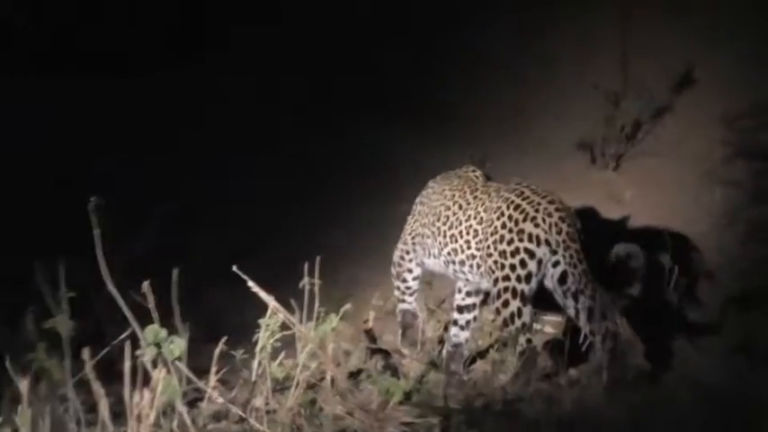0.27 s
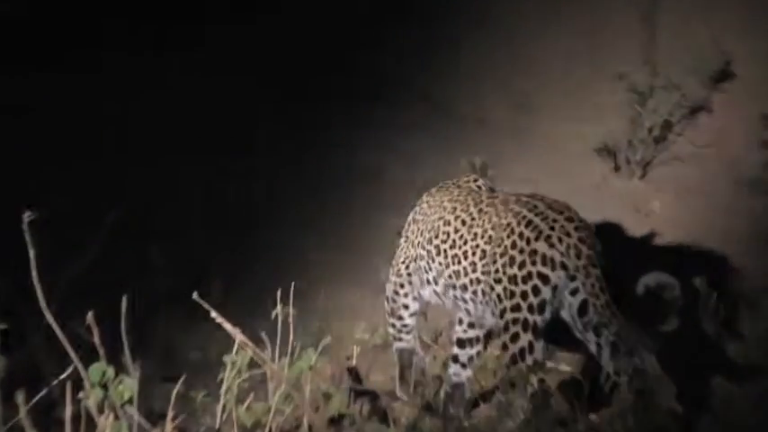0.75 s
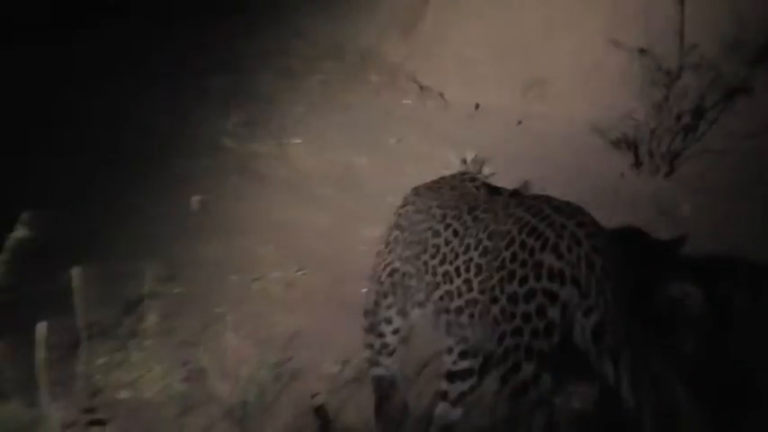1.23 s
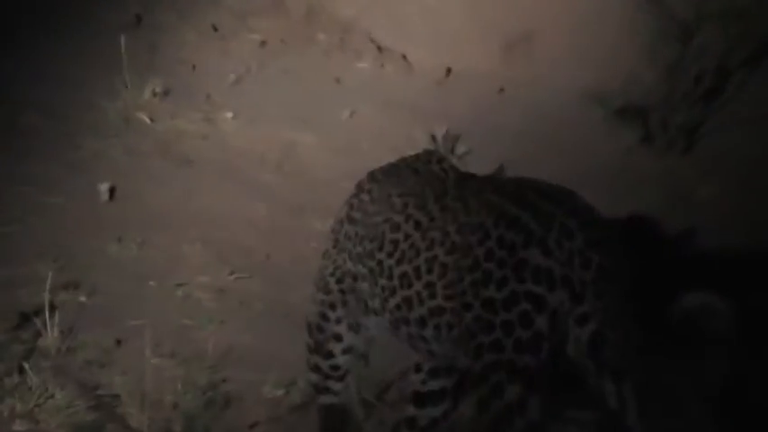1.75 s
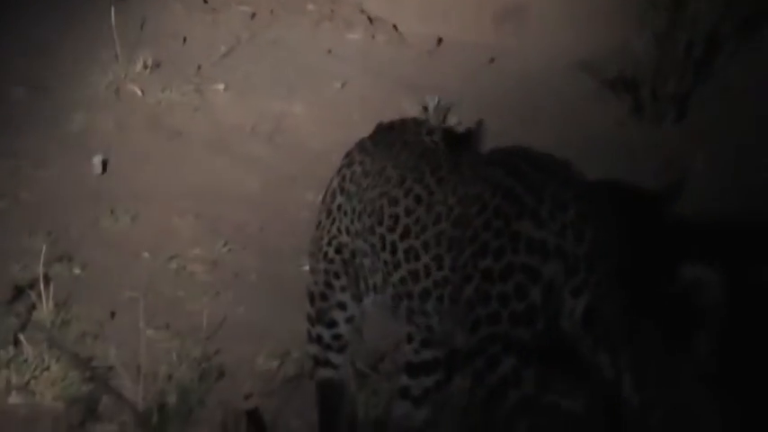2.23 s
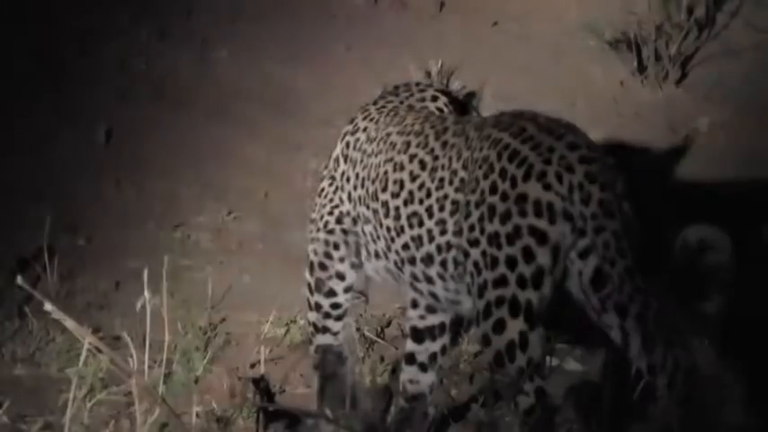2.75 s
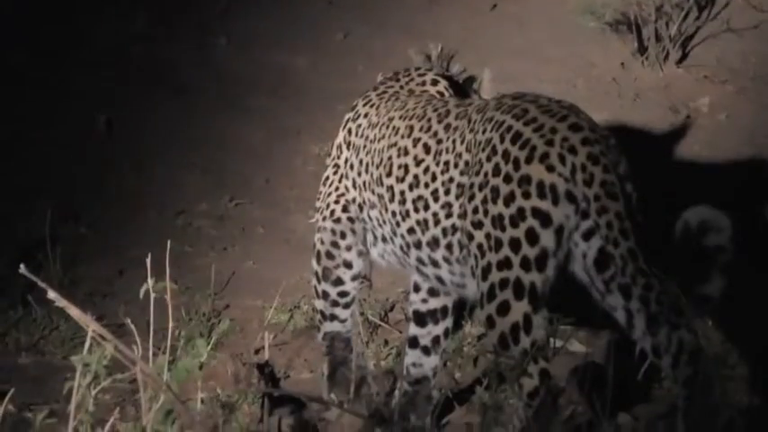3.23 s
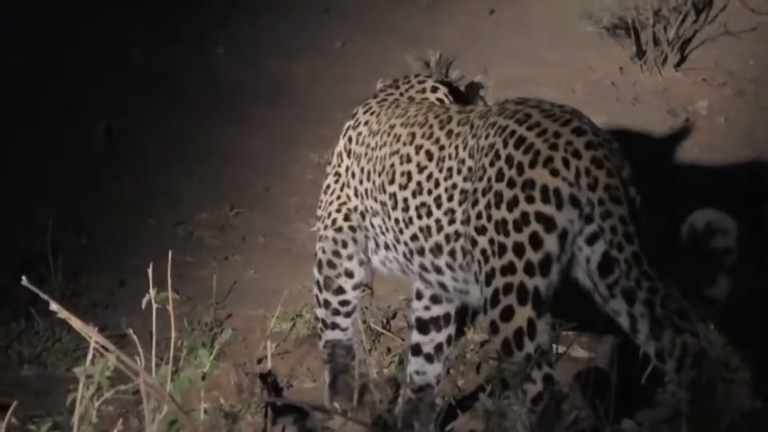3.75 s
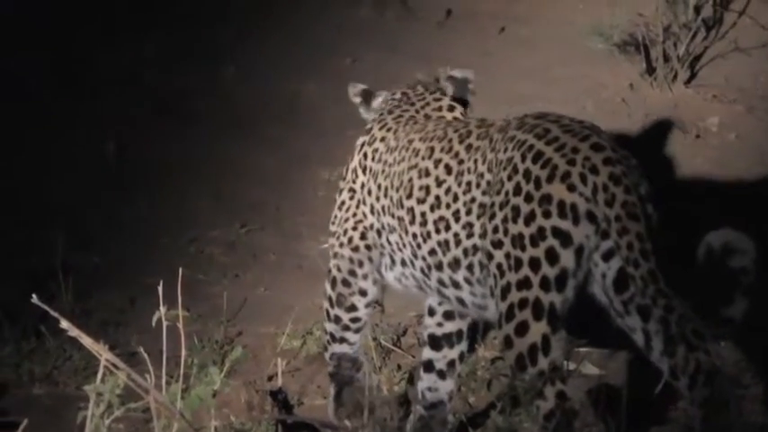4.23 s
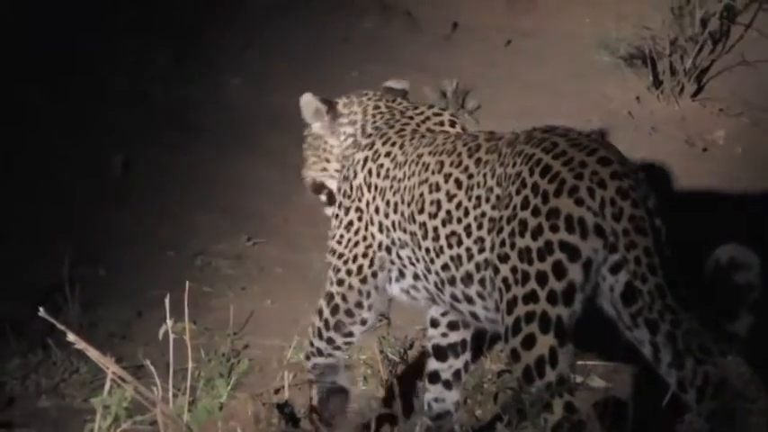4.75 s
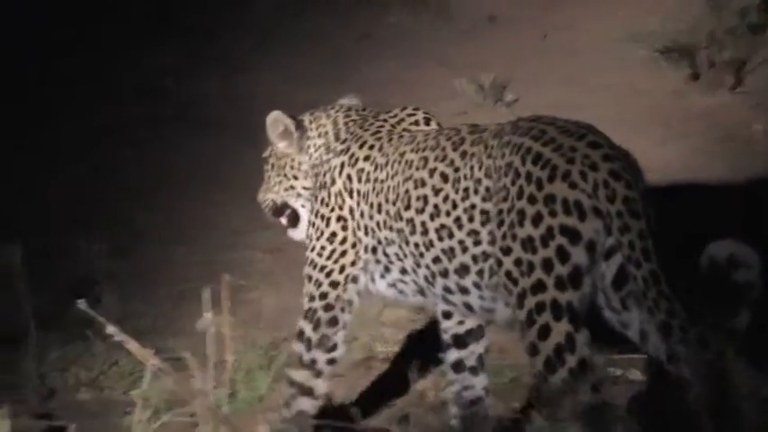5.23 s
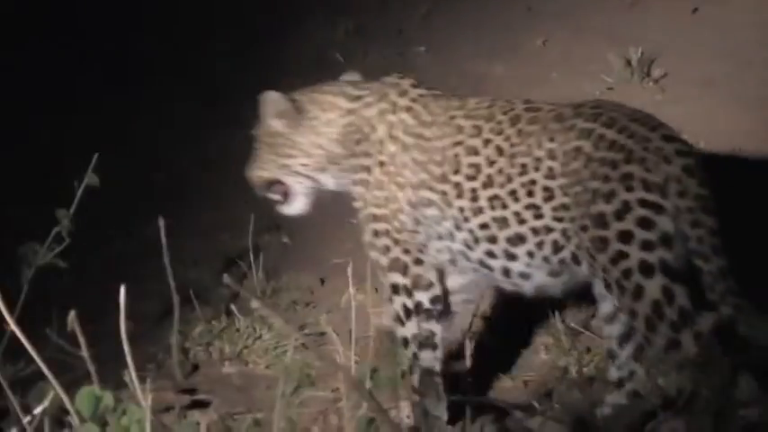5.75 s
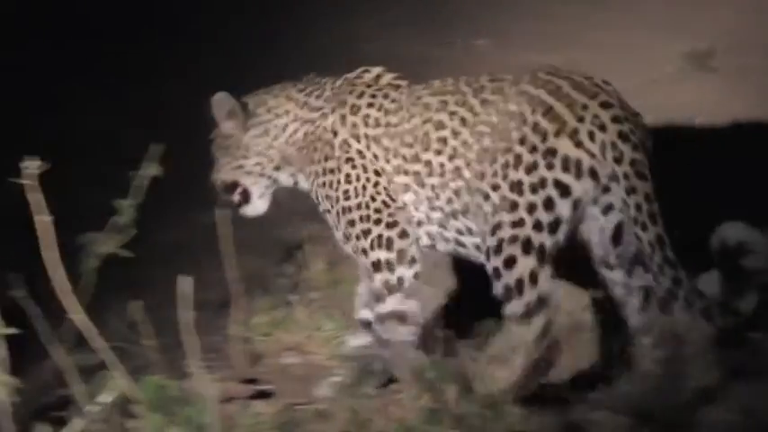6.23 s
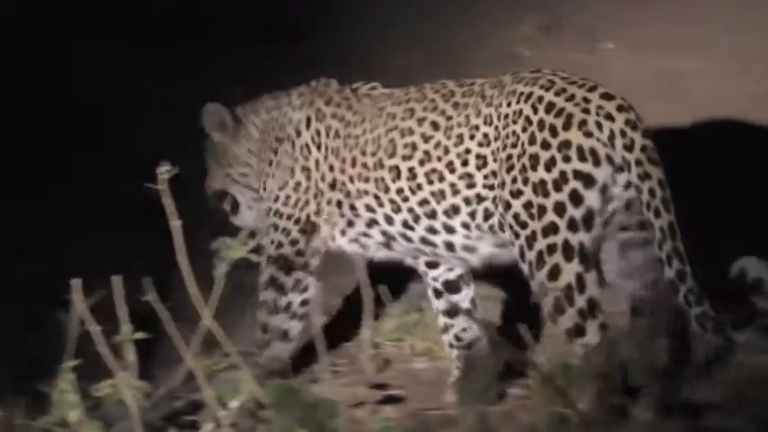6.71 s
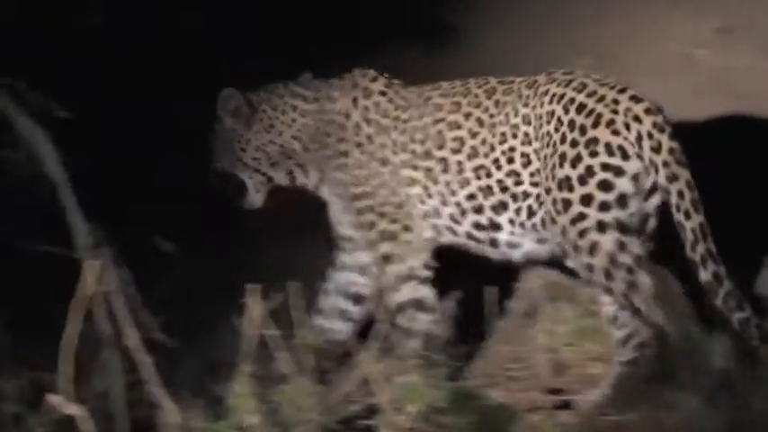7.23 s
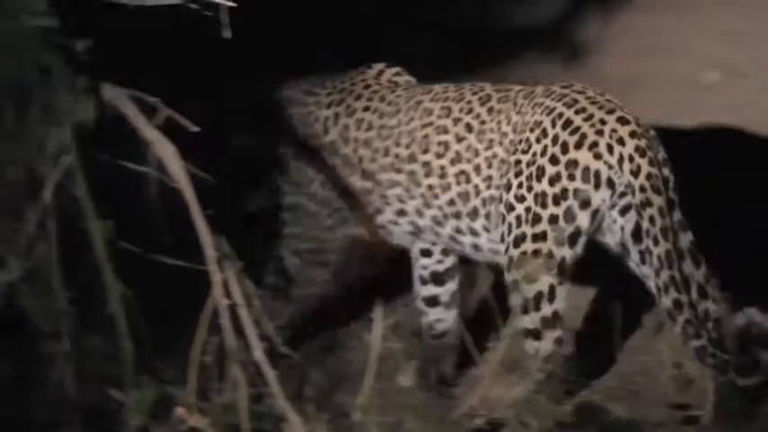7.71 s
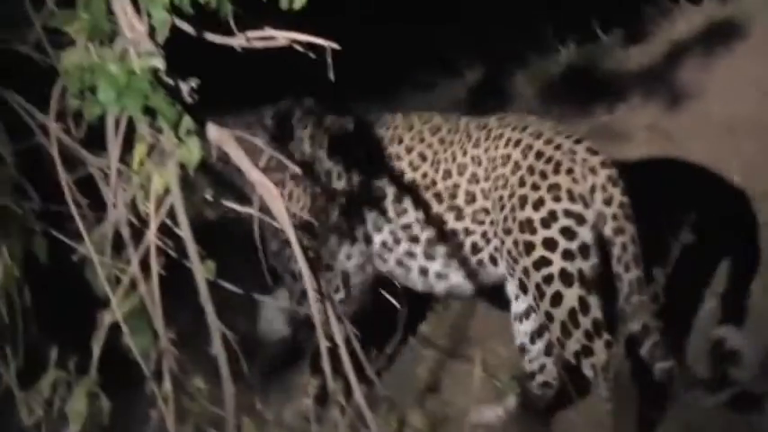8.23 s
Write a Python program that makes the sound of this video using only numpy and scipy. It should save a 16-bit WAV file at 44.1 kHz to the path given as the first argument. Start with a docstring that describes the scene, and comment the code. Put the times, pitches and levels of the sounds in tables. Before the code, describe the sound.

A leopard saws near the microphone, rough inward strokes alternating with three loud, low grunts before fading into soft croaks while a small bird trills faintly. The night bush then settles to a thin insect hiss and a distant engine slowly picking up speed. In the second half a nearby still camera takes three pictures in quick succession and a fourth after a pause, each a crisp double clack.

```python
"""Leopard sawing at night

From beside a bush track, a stereo microphone hears three rasping grunts, each led by a rougher
in-stroke, then a few croaks: slack vocal folds flap into a throat whose resonances move with the jaw.
Insects, a small bird, a brush of grass and a far engine fill the night. Later the mirror and curtains
of a still camera next to the microphone clack through four pictures."""
import sys
import numpy as np
from scipy import signal
from scipy.fft import rfft, irfft, next_fast_len
from scipy.io import wavfile
from scipy.ndimage import uniform_filter1d, map_coordinates

SR = 44100
rng = np.random.default_rng(int(sys.argv[2]) if len(sys.argv) > 2 else 0)


def transcribe(signal):
    """Save signal, clipped to [-1, 1], as a 16-bit WAV file at the path in sys.argv[1]."""
    frames = np.atleast_2d(signal).T
    limited = np.clip(frames, -1, 1)
    pcm = np.round(limited * 32767).astype(np.int16)
    wavfile.write(sys.argv[1], SR, pcm)


N = 373527
T = np.arange(N) / SR


def amp(db):
    """Decibels to gain."""
    return 10 ** (np.asarray(db) / 20)


def unit(x):
    """Scale to rms 1."""
    return x / np.sqrt(np.mean(x ** 2) + 1e-20)


def along(points, hz):
    """Read (Hz, value) points on a log frequency axis."""
    f, v = np.transpose(points)
    return np.interp(np.log(hz + 1), np.log(f + 1), v)


def curves(rows, t=T):
    """Each column after the time, read at the times t."""
    s, *columns = np.transpose(rows)
    return [np.interp(t, s, column) for column in columns]


def ramp(t, start, length):
    """Rises from 0 to 1 over length seconds after start."""
    return np.clip((t - start) / length, 0, 1)


def bump(t, centre, width):
    """A smooth swell of height 1."""
    return np.exp(-((t - centre) / width) ** 2)


def wobble(rate):
    """A smooth random curve, rate knots a second."""
    return map_coordinates(rng.standard_normal(int(N * rate / SR) + 4), [T * rate])


def filtered(x, response):
    """Filter x by a function of frequency."""
    n = x.shape[-1]
    m = next_fast_len(n + 8192)
    return irfft(rfft(x, m) * response(np.fft.rfftfreq(m, 1 / SR)), m)[..., :n]


def peak(f, hz, width_hz):
    """A resonant band of height 1 around hz."""
    return 1 / (1 + (2 * (f - hz) / width_hz) ** 2)


def noise(spectrum, size=N):
    """Coloured noise of rms 1."""
    return unit(filtered(rng.standard_normal(size), lambda hz: amp(along(spectrum, hz))))


def add(track, s, sound):
    """Mix a sound into a track at time s."""
    first = round(s * SR)
    sound = sound[..., max(-first, 0):]
    part = track[..., max(first, 0):][..., :sound.shape[-1]]
    part += sound[..., :part.shape[-1]]


def ring(age, hz, width_hz, rise_s):
    """A resonance struck age seconds ago."""
    return np.sin(2 * np.pi * hz * age) * np.exp(-np.pi * width_hz * age) * (1 - np.exp(-age / rise_s))


# The bank and shrubs around the microphone. Each row: frequency in Hz, seconds to die away by 60 dB.
BUSH_DECAY = [(200, 0.51), (2000, 0.2), (10000, 0.12)]

def placed(x, pan_db, wet_db):
    """A source with its scatter from the ground and shrubs; positive pan_db is to the left."""
    hz, t, spectra = signal.stft(rng.standard_normal((2, SR // 2)), SR, nperseg=256)
    decay = amp(-60 * t / along(BUSH_DECAY, hz)[:, None])
    tail = signal.istft(spectra * decay, SR, nperseg=256)[1]
    # long waves reach both sides of the microphone alike
    tail = tail + filtered(tail[::-1], lambda f: 1 / (1 + (f / 900) ** 2))
    echo = signal.fftconvolve(x[None], tail / np.linalg.norm(tail[0]), axes=1)[:, :N]
    return (x + amp(wet_db) * echo) * amp([[pan_db / 2], [-pan_db / 2]])


# The leopard's upper throat and mouth. Each row: resonance in Hz, width in Hz, relative level in dB.
MOUTH_MODES = [(367, 62, -35.5), (855, 99, -27), (1054, 65, -40.5), (1472, 22, -44), (2077, 64, -31),
               (2346, 170, -32), (2810, 260, -34), (4000, 80, -49)]

def stroke(shape, flaps, air, second_db, chest_hz, chest_db, mouth_db, colour, width_hz, rise_s,
           puff_s, rough):
    """One stroke of the saw: each flap of the folds rings the throat and lets out a puff of air."""
    # Each row of shape: seconds, voice in dB, first and second resonance in Hz, rasp in dB.
    # Each row of flaps: seconds, flap rate in Hz.
    start, end = flaps[0][0], flaps[-1][0]
    t = start + np.arange(int((end - start + .1) * SR)) / SR
    cycles = np.cumsum(curves(flaps, t)[0]) / SR
    beats = np.interp(np.arange(np.interp(end, t, cycles)), cycles, t)
    # slack folds flap unevenly (rough, 0-1) and rebound weakly between the main flaps
    beat_size = amp(2 * rough * rng.standard_normal(len(beats)))
    size = np.r_[beat_size, rough * rng.random(len(beats) - 1)][:, None]
    rebounds = beats[:-1] + np.diff(beats) * rng.uniform(.35, .65, len(beats) - 1)
    when = np.r_[beats, rebounds][:, None]
    when += .0007 * rough * rng.standard_normal(when.shape)
    age = np.maximum(t - when, 0)
    voice_db, first_hz, second_hz, _ = curves(shape, when)
    throat = -ring(age, first_hz, width_hz, rise_s) - amp(chest_db) * ring(age, chest_hz, 27, .015)
    mouth = sum(amp(db + rng.normal(0, 1.26, when.shape)) * ring(age, hz, width, .0013)
                for hz, width, db in MOUTH_MODES)
    upper = amp(second_db) * ring(age, second_hz, 56, .0018) + amp(mouth_db) * mouth
    # an open jaw raises the first resonance and lets more of the upper ones out
    opening = (first_hz / 235) ** 2.7
    voice = np.sum(size * amp(voice_db) * (throat + opening * upper), axis=0)
    # the puffs vary in strength and take on the colour of the mouth
    strength = np.sqrt(size) * amp(rng.normal(0, 2.4, when.shape))
    puffs = np.sum(strength * np.exp(-age / puff_s) * (1 - np.exp(-age / .0015)), axis=0)
    airflow = unit(puffs + .4 * np.clip((end - t) / .03, 0, 1))
    cavity = lambda f: 1 + colour * sum(peak(f, hz, width) for hz, width, _ in MOUTH_MODES)
    rasp = airflow * unit(filtered(noise(air, size=len(t)), cavity))
    rasp_db = curves(shape, t)[-1]
    track = np.zeros(N)
    add(track, start, voice + amp(rasp_db) * rasp)
    return track


# Breaths in. Each row: start in seconds, length in seconds, final flap rate in Hz, relative level in dB.
IN_STROKES = [(-.15, 0.24, 59.9, -1.5), (.604, 0.23, 52.04, .5), (1.392, .222, 43.03, -.5)]
# Air drawn in through the throat. Each row: frequency in Hz, spectrum level in dB.
INHALED_AIR = [(50, -9.5), (110, 25.5), (350, 27), (520, 14), (660, 8), (850, -4), (1130, 6.5),
               (1400, -16.5), (1850, 2), (2800, 2.5), (4200, -10), (6000, -17), (10000, -20), (16000, -25)]

def in_strokes():
    """Slow, uneven flaps speed up in a nearly shut throat while the effort swells and fades."""
    start_hz, first_hz, second_hz, fade_s = 19.5, 199.3, 653, .086
    for start, length, end_hz, level_db in IN_STROKES:
        t = np.linspace(0, length, 100)
        crest = length - fade_s
        effort_db = level_db - 10 * (1 - ramp(t, 0, crest)) - 12.5 * ramp(t, crest, fade_s) ** 2
        shape = [(start + s, db - 8.7, first_hz, second_hz, 1.07 * db - 36.1)
                 for s, db in zip(t, effort_db)]
        flaps = [(start, start_hz), (start + length, end_hz)]
        yield stroke(shape, flaps, INHALED_AIR, second_db=-22.5, chest_hz=96, chest_db=-15.5,
                     mouth_db=-24, colour=.16, width_hz=36, rise_s=.004, puff_s=.018, rough=.5)


# Breaths out. Each row: start and length in seconds, seconds until the jaw starts to close,
# seconds until the push ends, relative level in dB.
OUT_STROKES = [(.115, .355, .172, 0.28, 0.5), (.868, 0.33, .195, .312, -0.26),
               (1.651, .345, 0.187, .29, -.3)]
# Air forced out through the throat. Each row: frequency in Hz, spectrum level in dB.
EXHALED_AIR = [(150, -18.5), (400, 13.5), (650, 10.5), (900, 4.5), (1100, 4.5), (1320, -6), (1650, 0),
               (2050, 1), (2800, -6.5), (3500, -11.5), (4300, -15.5), (6000, -23.5), (10000, -22),
               (16000, -43)]

def grunts():
    """A push of breath flaps the folds while the jaw opens from ajar, holds and shuts."""
    ajar, open_s, shut_s = .31, .092, .1
    start_hz, rise_hz_per_s, top_hz, slack_hz = 50.84, 112, 69.67, 43.1
    tire_db_per_s, release_db_per_s = 21.5, 241
    for start, length, jaw_s, push_s, level_db in OUT_STROKES:
        t = np.linspace(0, length, 100)
        jaw = (ajar + (1 - ajar) * ramp(t, 0, open_s)) * (1 - ramp(t, jaw_s, shut_s))
        first_hz = np.interp(jaw, [0, 1], [200.7, 261.4])
        second_hz = np.interp(jaw, [0, 1], [552, 658])
        # the push comes in fast, tires, and dies away
        push_db = level_db - 10 * (1 - ramp(t, 0, .018)) - tire_db_per_s * t
        push_db -= release_db_per_s * np.maximum(t - push_s, 0)
        # a last squeeze as the jaw shuts makes the voice louder and hoarser
        squeeze = bump(t, jaw_s + .061, .045)
        voice_db = -4.6 + push_db + 2.5 * squeeze
        rasp_db = -43.5 + .57 * push_db + 5.5 * squeeze
        # the folds speed up to a top rate, then slacken as the push ends
        taut_hz = np.minimum(start_hz + rise_hz_per_s * t, top_hz)
        flap_hz = taut_hz + (slack_hz - taut_hz) * ramp(t, push_s - .025, .06)
        shape = np.transpose([start + t, voice_db, first_hz, second_hz, rasp_db])
        flaps = np.transpose([start + t, flap_hz])
        yield stroke(shape, flaps, EXHALED_AIR, second_db=-20.3, chest_hz=217.4, chest_db=-15,
                     mouth_db=-1.3, colour=1.6, width_hz=41, rise_s=.0043, puff_s=.0048, rough=.1)


# The end of the call. Each row: start in seconds, relative level in dB, throat resonance in Hz.
LAST_FLAPS = [(2.181, -28, 208), (2.245, -32.5, 205), (2.303, -24.5, 202), (2.352, -27.5, 202),
              (2.411, -28, 194), (2.451, -35.5, 160), (2.531, -27, 199), (2.648, -34.5, 180),
              (2.68, -29, 159), (2.714, -28.5, 164), (2.75, -26.5, 183)]

def croaks(gain_db):
    """As the call runs out the folds give single dull flaps."""
    track, age = np.zeros(N), np.arange(SR // 8) / SR
    for s, db, hz in LAST_FLAPS:
        # slacker, lower flaps leak more air and shake the chest
        slack = (200 / hz) ** 4
        air = filtered(noise(EXHALED_AIR, size=len(age)), lambda f: 1 / (1 + (f / 1300) ** 4))
        puff = amp(-36) * np.exp(-age / .018) * air
        chest = amp(-15) * ring(age, 92, width_hz=30, rise_s=.008)
        throat = ring(age, hz, width_hz=40, rise_s=.0048)
        add(track, s, amp(db + gain_db) * (slack * (puff - chest) - throat))
    return track


# The call arriving at the microphone. Each row: frequency in Hz, lead of the left side in radians.
LEFT_LEAD = [(0, 0), (260, -0.46), (1550, -0.022), (4050, 0.0), (4650, 0.6), (5940, -0.0), (16000, 0.0)]

def leopard():
    """A little to the right, in-strokes alternate with loud grunts; a few croaks end the call."""
    call = croaks(gain_db=8.7) + sum(grunts()) + sum(in_strokes())
    # a mouth is too small to radiate the deepest bass
    call = filtered(call, lambda hz: hz ** 3 / (hz ** 3 + 68 ** 3))
    pair = placed(call, pan_db=-1.8, wet_db=-17)
    return filtered(pair, lambda hz: np.exp(.5j * along(LEFT_LEAD, hz) * np.array([[1], [-1]])))


# Sound from all around the microphone. Each row: frequency in Hz, left-right correlation.
LIKENESS = [(60, 0.29), (100, 0.065), (180, 0.63), (310, 0.49), (550, 0.098), (950, 0.065), (1650, -0.21),
            (2860, -0.0046), (4970, 0.64), (8640, 1), (15000, 0.58)]

def ambience(spectrum):
    """Stereo noise whose likeness between left and right depends on pitch."""
    turn = lambda hz: np.arccos(np.clip(along(LIKENESS, hz), -1, 1)) / 2
    mid = filtered(noise(spectrum), lambda hz: np.cos(turn(hz)))
    side = filtered(noise(spectrum), lambda hz: np.sin(turn(hz)))
    return np.array([mid + side, mid - side])


# The bush at night. Each row: time in seconds, relative levels of rumble and of hiss in dB.
NIGHT_LEVELS = [(2.85, -54, -59), (4.45, -56, -60.5), (5.65, -52.5, -57.5), (6.4, -53.5, -60),
                (8.47, -54, -58.5)]
# The colours of that rumble and hiss. Each row: frequency in Hz, spectrum level in dB.
RUMBLE_SPECTRUM = [(12, -40), (20, -15), (48, -15), (75, -9), (108, -8), (140, -7), (211, -3), (240, -11.5),
                   (277, -7), (325, -11), (595, -23.5), (720, -24), (900, -33), (1170, -59), (1980, -120)]
HISS_SPECTRUM = [(500, -32), (950, 1), (1250, 3), (1750, 0.5), (2170, 6.5), (2450, -2.5), (3000, -1.5),
                 (4100, -8.5), (5100, -1), (6200, -10), (7000, -7.5), (8300, -16.5), (13000, -14),
                 (16000, -15.5)]

def night():
    """Low rumble under a hiss with broad bands of distant insects."""
    rumble_db, hiss_db = curves(NIGHT_LEVELS)
    rumble = amp(rumble_db + 2.5 + .54 * wobble(9)) * ambience(RUMBLE_SPECTRUM)
    hiss = amp(hiss_db + 2 + .19 * wobble(5)) * ambience(HISS_SPECTRUM)
    return rumble + hiss


# Night callers far out in the bush. Each row: pitch in Hz, width in Hz, level in dB.
CALLER_BANDS = [(733, 44, -73), (1343, 29, -76.5), (1884, 50, -73.5), (2165, 103, -65.5), (4740, 500, -73),
                (7400, 320, -91)]

def chorus():
    """Many far callers merge into narrow bands that waver, one mix on each side."""
    band = lambda hz, width: unit(filtered(rng.standard_normal((2, N)), lambda f: peak(f, hz, width)))
    return sum(amp(db + 1.1 * wobble(3.14)) * band(hz, width) for hz, width, db in CALLER_BANDS)


def bird_whistle(start, length, high_hz, low_hz, glide_s, level_db):
    """A small bird's one whistle glides down and levels off."""
    hz = low_hz + (high_hz - low_hz) * np.exp(-np.maximum(T - start, 0) / glide_s)
    envelope = amp(level_db) * np.sin(np.pi * ramp(T, start, length))
    return envelope * np.sin(2 * np.pi * np.cumsum(hz) / SR)


def bird_trill(start, length, high_hz, low_hz, notes_per_s, loudest_s):
    """The bird's run of short scooped notes falls ever faster in pitch and swells near its end."""
    progress = ramp(T, start, length)
    hz = high_hz + (low_hz - high_hz) * progress ** 1.5
    db = -64 + 10 * bump(T, loudest_s, .22) + 1.2 * wobble(8.8)
    beat = np.cos(2 * np.pi * notes_per_s * (T - 2.291))
    scoop = .985 + .06 * np.sqrt(1 - beat) + .011 * wobble(150)
    notes = np.maximum(beat, 0) * (progress > 0) * (progress < 1)
    return amp(db) * notes * np.sin(2 * np.pi * np.cumsum(hz * scoop) / SR)


# The rasp of a bush cricket's wings. Each row: frequency in Hz, spectrum level in dB.
WING_SPECTRUM = [(7000, -45.5), (10300, -15.5), (11800, -7.5), (12800, -3), (13900, -6.5), (15200, -14.5)]
# Puffs of high buzzing. Each row: midpoint in seconds, length in seconds, level in dB.
WING_BUZZES = [(2.522, 0.32, -63), (3.038, 0.091, -63), (3.274, 0.21, -65), (3.845, .17, -64.5),
               (4.42, 0.14, -64.5)]

def crickets(tick_hz, swell_db_per_s, peak_s, stop_s):
    """Bush crickets rasp their wings: a ticking song swells, holds and gives way to short buzzes."""
    ticks = (.5 + .5 * np.cos(2 * np.pi * tick_hz * (T - 2.005))) ** 2
    song_db = -65 - swell_db_per_s * np.maximum(peak_s - T, 0)
    song = amp(song_db) * (1 - ramp(T, stop_s, .11)) * unit(ticks + .3)
    buzz = sum(amp(db) * bump(T, s, length / 2) for s, length, db in WING_BUZZES)
    return np.hypot(song, buzz) * ambience(WING_SPECTRUM)


def rustle(s, length, level_db):
    """A brief brush through dry grass."""
    blades = ambience([(2000, -20), (4500, -5), (8500, 3.5), (11000, -5), (15000, -8.5)])
    return amp(level_db + 2.2 * wobble(150)) * bump(T, s, length / 2) * blades


# An engine a long way off. Each row: time in seconds, firing rate in Hz, relative level in dB.
ENGINE_RUN = [(2.8, 91, -58), (3.8, 93, -60), (4.05, 89.4, -47.5), (4.2, 82, -49.5), (4.55, 71, -60),
              (4.8, 87.4, -46), (5.1, 101, -54), (5.7, 123, -51.5), (6.7, 140, -49.5), (7.05, 136, -49.5),
              (7.5, 148.5, -45.5), (7.8, 137.3, -50), (8.2, 145, -45.5), (8.47, 142, -50.5)]
# Its exhaust as heard from the track. Each row: frequency in Hz, gain in dB.
EXHAUST_COLOUR = [(70, -2), (145, -0.5), (185, -0.5), (230, 2.5), (280, -5.5), (330, -14), (450, -12)]

def vehicle():
    """A far engine eases off and picks up speed; only its lowest three orders carry."""
    hz, db = curves(ENGINE_RUN)
    phase = 2 * np.pi * np.cumsum(hz * (1 + .0049 * wobble(18))) / SR
    hum = sum(amp(along(EXHAUST_COLOUR, k * hz) + 1.05 * wobble(7)) * np.sin(k * phase) / k ** 1.03
              for k in (1, 2, 3))
    return amp(db - 2) * hum


# Pictures taken next to the microphone. Each row: mirror up in seconds, mirror down in seconds.
EXPOSURES = [(5.366, 5.4463), (5.5912, 5.6715), (5.817, 5.8981), (7.2283, 7.3376)]
# Contacts of mirror and curtain. Each row: delay in seconds, relative level in dB, brightness in dB.
UP_CONTACTS = [(0, -26, -28.5), (.0207, -21, -10), (.0505, -33.5, -20), (.06, -39, -18.5)]
DOWN_CONTACTS = [(0, -28.5, -19.5), (.011, -25, -13), (.015, -23.5, -2), (.0305, -18, -4.5),
                 (.034, -23.5, -7), (.046, -30, -15), (.071, -34, -16)]
# The camera's body. Each row: frequency in Hz, gain in dB.
BODY_COLOUR = [(410, -45), (700, -25), (1010, -3.5), (1510, -2), (1680, -13), (1890, 3), (2450, -8.5),
               (2680, -0.5), (3390, -5), (3670, 0.5), (5020, -0.5), (7040, 1.5), (8340, -1), (13700, -3.5),
               (15800, -7.5)]
# Its ringing parts. Each row: resonance in Hz, width in Hz, gain in dB.
PART_MODES = [(1866, 260, 3), (3610, 130, -2.5), (4270, 71, -0.5), (6000, 120, -3.5), (7200, 100, -8),
              (7020, 130, -1), (8250, 230, -21), (9800, 180, -1), (11500, 75, 3.5), (12500, 320, -4)]
# Its place, close on the left. Each row: frequency in Hz, left minus right in dB.
CAMERA_BALANCE = [(1000, 6.5), (2000, 8), (4000, 5), (8000, 2), (13000, 4.5)]

def shutter(gain_db, t60, rise_s, grit):
    """Mirror up, curtains, mirror down: every contact is a tiny rattle in the camera's body."""
    track, age = np.zeros((2, N)), np.arange(SR // 10) / SR
    envelope = amp(-60 * age / t60) * (1 - np.exp(-age / rise_s)) ** 2
    contacts = [(s + delay, db, bright_db) for up, down in EXPOSURES
                for s, movement in ((up, UP_CONTACTS), (down, DOWN_CONTACTS))
                for delay, db, bright_db in movement]
    for s, db, bright_db in contacts:
        rattle = rng.standard_normal((2, len(age)))
        rattle *= np.exp(grit * uniform_filter1d(rng.standard_normal(len(age)), size=24))
        tilt = lambda hz: amp((bright_db + 8.5) * along([(3000, -.25), (11000, .29)], hz))
        add(track, s - rise_s / 2, amp(db + gain_db) * filtered(rattle * envelope, tilt))
    direct, side = filtered(track, lambda hz: amp(along(BODY_COLOUR, hz)))
    parts = lambda f: sum(amp(db) * 1j * f * width / (hz * hz - f * f + 1j * f * width)
                          for hz, width, db in PART_MODES)
    ringing = filtered(track[1], parts)
    pair = placed(direct + ringing, pan_db=0, wet_db=-7.5) + amp(-8) * np.array([side, -side])
    return filtered(pair, lambda hz: amp(along(CAMERA_BALANCE, hz) * np.array([[.5], [-.5]])))


def scene():
    """Everything heard from one spot beside the track."""
    camera = shutter(gain_db=2.8, t60=.033, rise_s=.003, grit=.65)
    background = vehicle() + night() + chorus()
    background += crickets(tick_hz=22.4, swell_db_per_s=11, peak_s=2.1, stop_s=2.8)
    background *= amp([[-.45], [.45]])  # leans slightly right
    call = leopard()
    whistle = bird_whistle(start=.145, length=.08, high_hz=3650, low_hz=2830, glide_s=.03, level_db=-56)
    trill = bird_trill(start=1.15, length=1.45, high_hz=3270, low_hz=2225,
                       notes_per_s=13.9, loudest_s=2.27)
    bird = placed(whistle + trill, pan_db=-.5, wet_db=-4.5)
    grass = rustle(1.705, length=.05, level_db=-55.5)
    return call + background + bird + grass + camera


def record(dry):
    """The recorder keeps nothing above its band limit."""
    return filtered(dry, lambda hz: hz < 15850)


dry = scene()
out = record(dry)
transcribe(out)
```